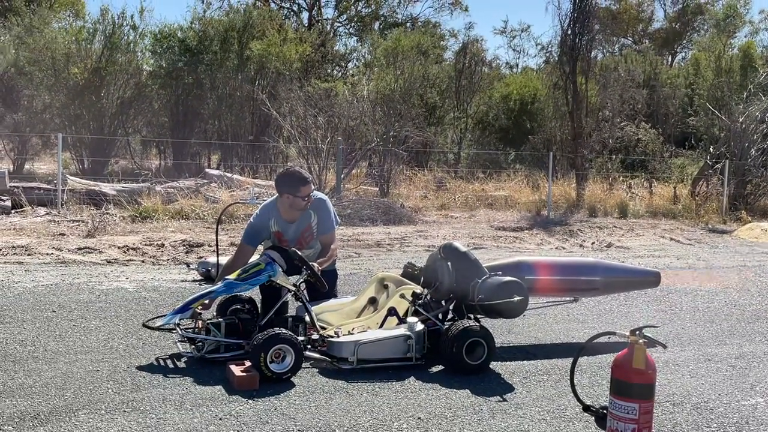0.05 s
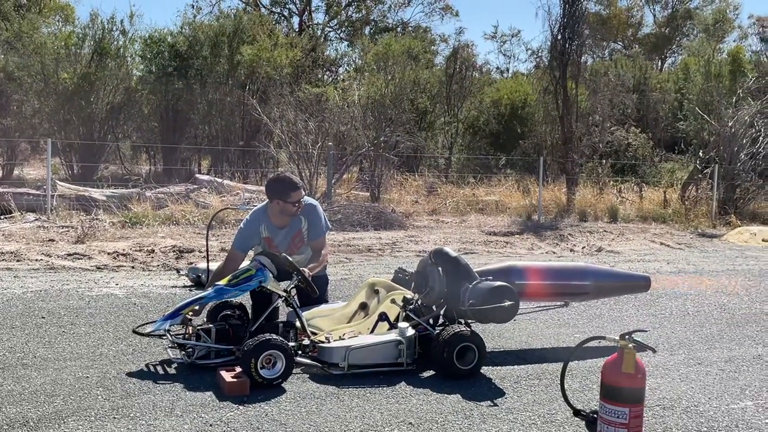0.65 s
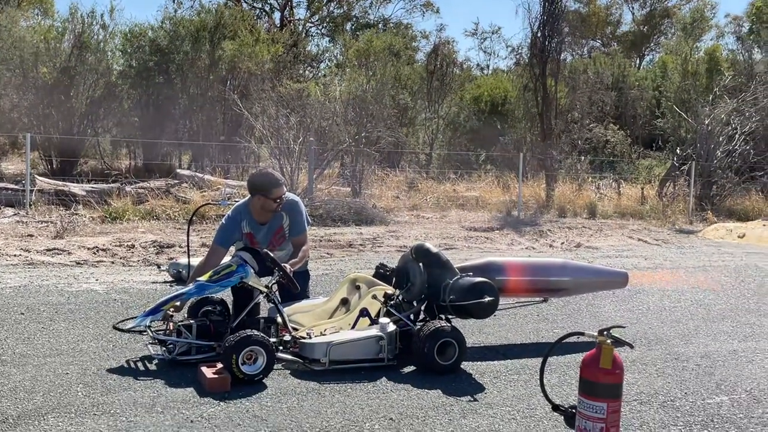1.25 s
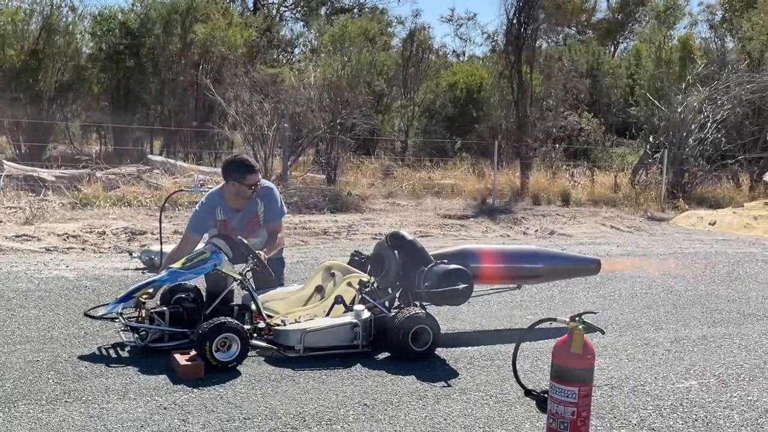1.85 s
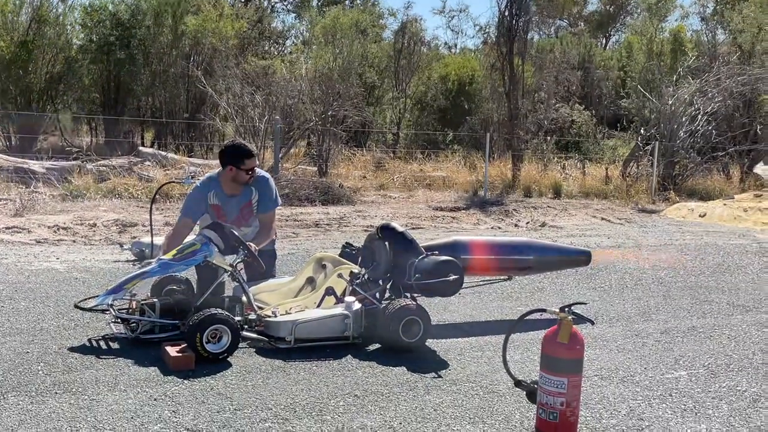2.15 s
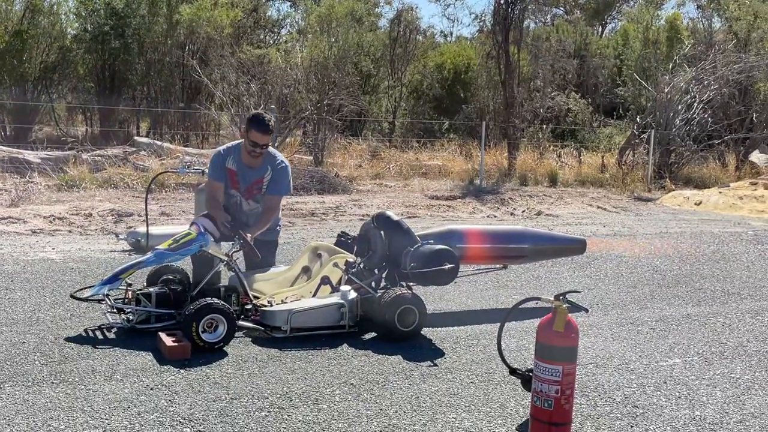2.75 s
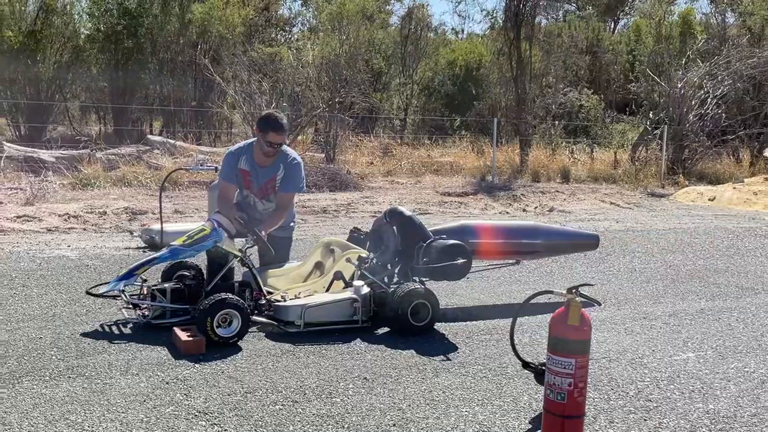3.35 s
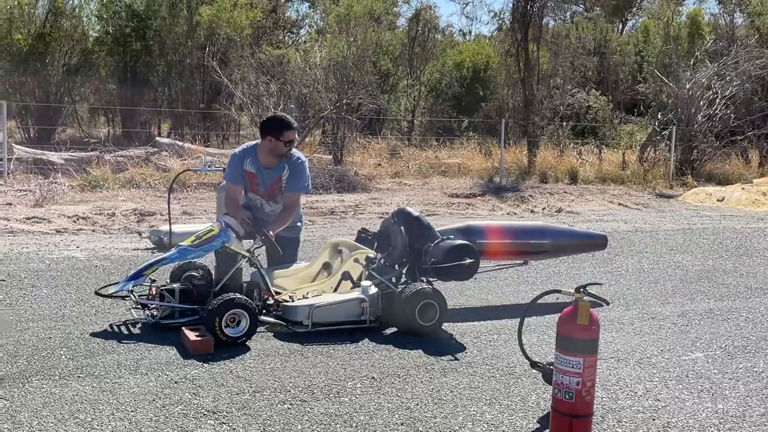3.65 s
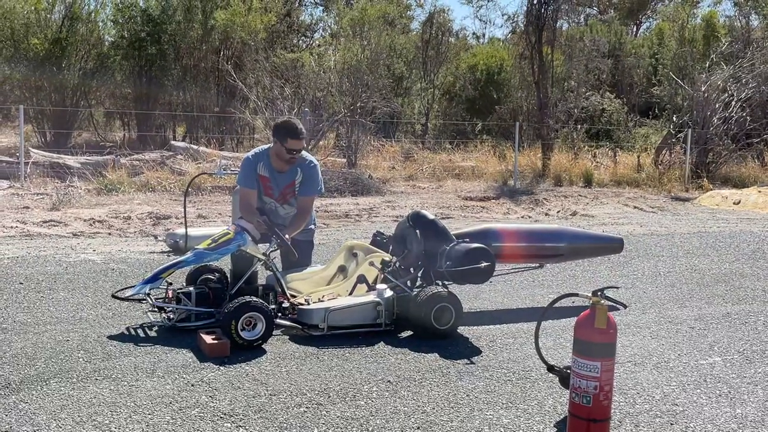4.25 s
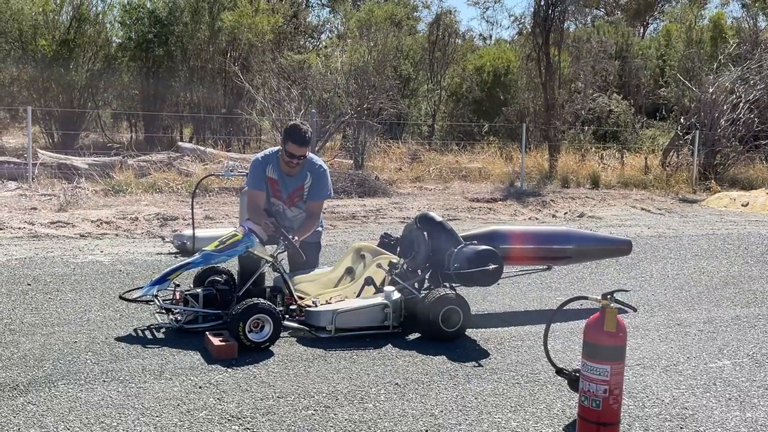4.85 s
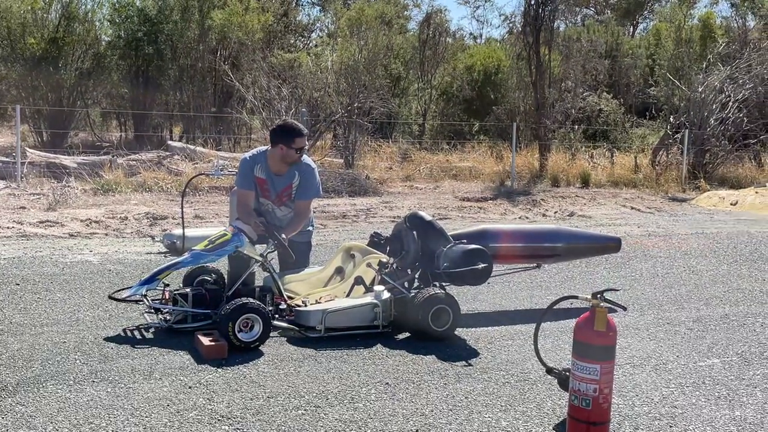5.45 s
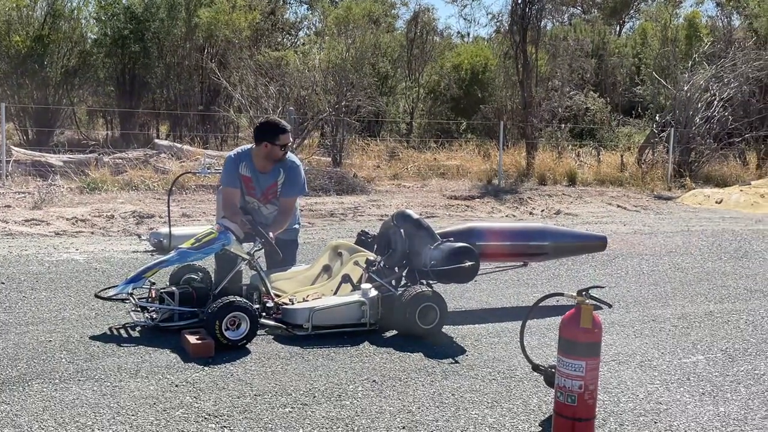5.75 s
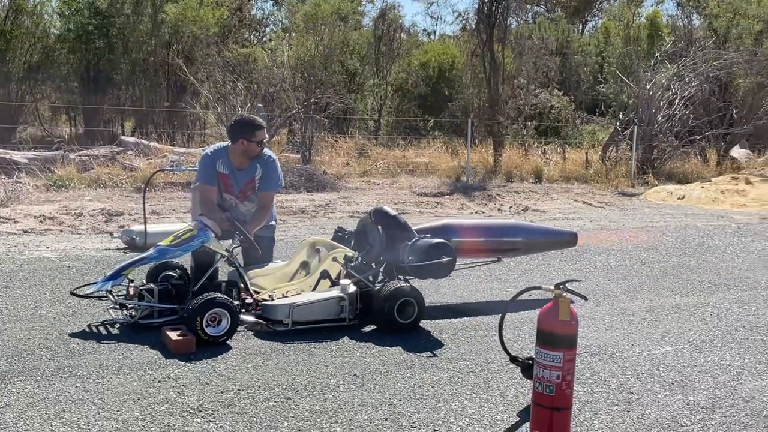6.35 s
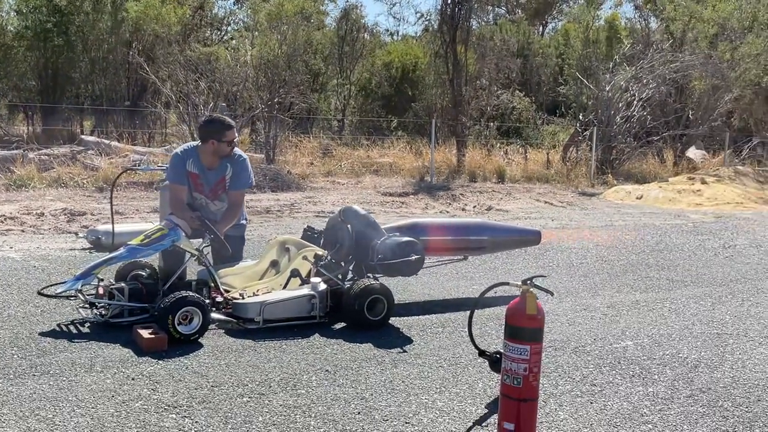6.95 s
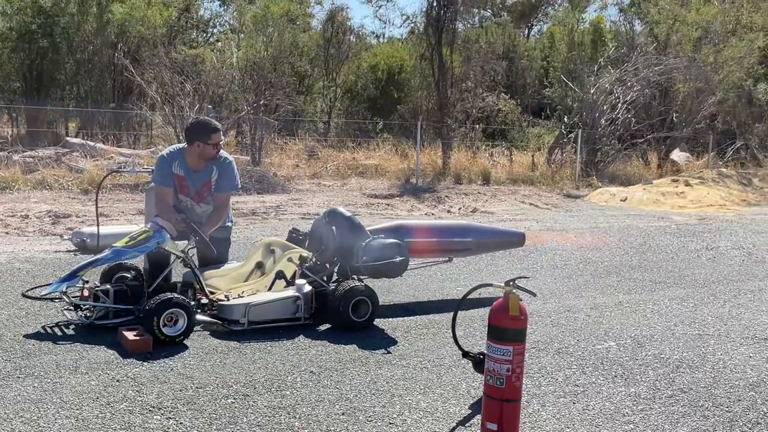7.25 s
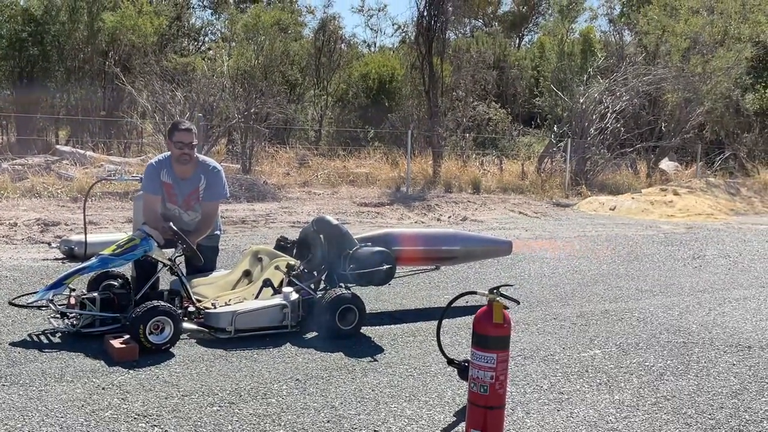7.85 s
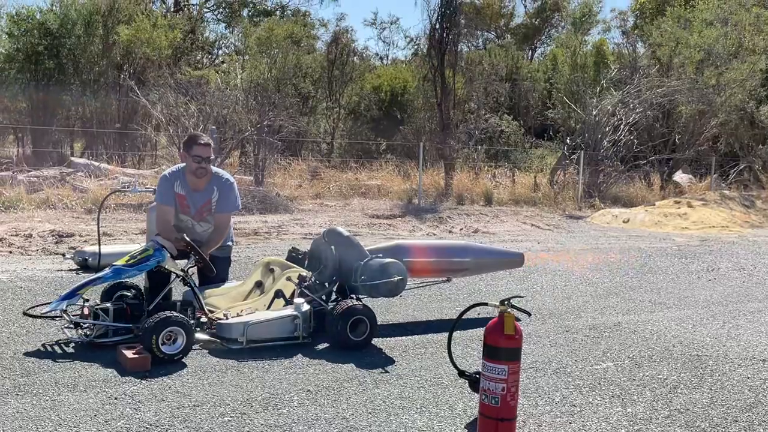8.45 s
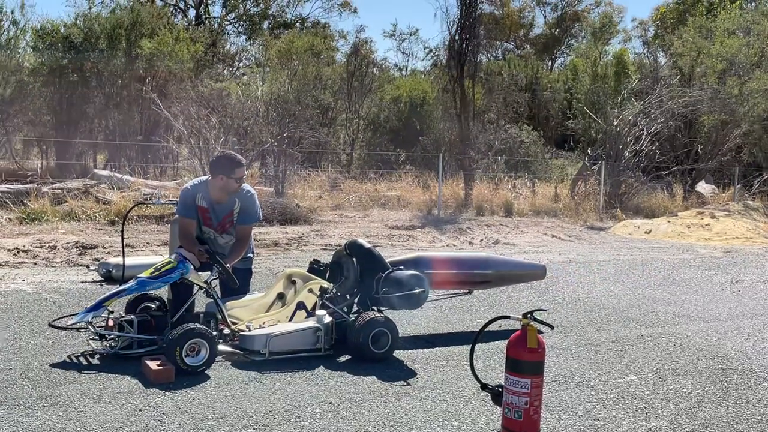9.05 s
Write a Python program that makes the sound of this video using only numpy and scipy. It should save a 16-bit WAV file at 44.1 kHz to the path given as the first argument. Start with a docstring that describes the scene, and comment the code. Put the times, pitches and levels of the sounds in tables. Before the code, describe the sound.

Outdoors on open pavement, a go-kart's small turbojet burns with a deep, tearing, crackling roar, a little right of the microphone. The roar falls away and a thin high whine rises above hissing air. A sudden bang restarts the afterburner, followed by a shriek that fades into more roaring with a few sharp knocks. The flame stops again, leaving whine and hiss.

```python
"""On open asphalt, a parked go-kart runs a home-built turbojet with an afterburner.
The flame roars, rasps and crackles until its fuel is cut. Freed of the back pressure, the rotor
whines upward over the hiss of the intake and the hollow blow of the bare jet pipe.
The afterburner relights with a bang, screeches on a cross mode of the pipe, roars and is cut again."""
import sys
import numpy as np
from scipy import signal
from scipy.fft import rfft, irfft, next_fast_len
from scipy.io import wavfile

SR = 44100
rng = np.random.default_rng(int(sys.argv[2]) if len(sys.argv) > 2 else 0)


def file_out(sig):
    """Save sig as 16-bit WAV at sys.argv[1]."""
    # one column per channel
    cols = np.atleast_2d(sig).T
    # limit, then scale
    lim = np.clip(cols, -1, 1)
    pcm = np.round(lim * 32767).astype(np.int16)
    wavfile.write(sys.argv[1], SR, pcm)


N = 405719
TIME = np.arange(N) / SR
OPPOSITE = np.array([[1], [-1]])  # left and right in opposite polarity
FREE_HZ, CRUISE_HZ = 7225, 6500  # rotor pitch: unloaded, and at cruise
GO_OUT_S = 0.075  # last fade of the flame and of the screech


def from_db(db):
    """Decibels to gain."""
    return 10 ** (np.asarray(db) / 20)


def rms_one(x):
    """Scale to unit rms."""
    return x / np.sqrt(np.mean(x ** 2) + 1e-20)


def butter(order, hz, kind="low"):
    """Butterworth filter sections."""
    return signal.butter(order, hz, kind, fs=SR, output="sos")


def curve(points):
    """Straight lines between (time, value) points, at every sample."""
    return np.interp(TIME, *np.transpose(points))


def ramp(s, length_s):
    """Zero until the given time, then a straight rise to one."""
    return np.clip((TIME - s) / length_s, 0, 1)


def since(s):
    """Seconds gone by since the given time, zero before it."""
    return np.maximum(TIME - s, 0)


def dying(s, time_constant_s):
    """One until the given time, then an exponential fall."""
    return np.exp(-since(s) / time_constant_s)


def bump(s, half_s):
    """A bell-shaped swell that peaks at the given time."""
    return np.exp(-((TIME - s) / half_s) ** 2)


def phase_of(hz):
    """Running phase of a moving pitch."""
    return 2 * np.pi * np.cumsum(hz) / SR


def drift(rate_hz):
    """Random wander of rms 1 at about the given rate, drawn at every tenth sample."""
    r = np.exp(-2 * np.pi * rate_hz * 10 / SR)
    run_in = SR // 10
    white = rng.standard_normal(N // 10 + 2 + run_in)
    slow = signal.lfilter([1], [1, -2 * r, r * r], white)[run_in:]
    return np.interp(np.arange(N) / 10, np.arange(len(slow)), rms_one(slow))


def resonate(x, hz, width_hz):
    """One resonance with gain 1 at its top."""
    r = np.exp(-np.pi * width_hz / SR)
    poles = [1, -2 * r * np.cos(2 * np.pi * hz / SR), r * r]
    return signal.lfilter(np.array([1, 0, -1]) * (1 - r * r) / 2, poles, x)


def gains(colour):
    """Gain of every frequency bin, from (Hz, dB) points joined on a log axis."""
    hz, db = np.transpose(colour)
    bins = np.maximum(np.fft.rfftfreq(next_fast_len(N), 1 / SR), 1)
    return from_db(np.interp(np.log(bins), np.log(hz), db))


def shaped_noise(gain):
    """Gaussian noise with the given gain in every frequency bin."""
    real, imaginary = rng.standard_normal((2, len(gain)))
    return irfft(gain * (real + 1j * imaginary), next_fast_len(N))[:N]


def noise(colour):
    """Coloured noise of rms 1."""
    return rms_one(shaped_noise(gains(colour)))


def narrow_noise(hz, width_hz):
    """A narrow band of noise with rms 1."""
    return rms_one(resonate(resonate(rng.standard_normal(N), hz, width_hz), hz, 4 * width_hz))


def gliding_noise(hz, spread_hz):
    """A band of noise with rms 1 whose centre follows a moving pitch."""
    phase = phase_of(hz)
    return drift(spread_hz) * np.sin(phase) + drift(spread_hz) * np.cos(phase)


# colour of the hiss as heard, centred below 6 kHz, with a gap in the centre near 14 kHz:
# (frequency [Hz], level [dB])
CENTRE_HISS = [(1500, -18), (3000, 7.5), (4500, 12.5), (5800, 7), (6500, 12.5), (7400, -24), (8400, 0),
               (10000, 5.5), (11500, 6), (12900, 1), (13800, -33), (15800, -4)]
SIDE_HISS = [(5000, -90), (6200, -49), (6700, 19.5), (8000, 16), (9500, 10), (11000, -13), (12500, 1),
             (13500, 16.5), (15800, -6)]


def stereo_hiss(side_db):
    """A centred hiss with a wide, bright sheen."""
    return noise(CENTRE_HISS) + from_db(side_db) * noise(SIDE_HISS) * OPPOSITE


def with_ground_echo(x, delay_s=0.0024, sway_s=0.00003, echo_db=-15):
    """A weak reflection off the asphalt lays a slowly shifting ripple over the spectrum."""
    earlier = TIME - delay_s - sway_s * drift(0.8)
    return x + from_db(echo_db) * np.array([np.interp(earlier, TIME, side) for side in x])


# swells of the intake hiss: (time [s], relative level [dB])
SUCTION_SWELLS = [(0, 3.5), (1.0, 0.0574), (2.8, -1.5), (3.24, -4), (3.35, -3), (3.47, -1.5), (3.57, -3),
                  (3.68, 1.5), (3.82, 1.5), (4.0, 5), (4.23, 1.5), (4.55, 4.5), (4.68, 6), (4.77, 9),
                  (4.86, 4), (4.97, 7.5), (5.15, 5), (5.4, 9), (6.15, -0.5), (6.42, 0.5), (6.95, -2),
                  (7.25, 0.5), (7.88, -5), (8.07, 1), (8.3, -5), (8.76, -3.5), (8.93, 0), (9.04, -2),
                  (9.17, 1)]


def intake(hz, cruise_db=-43.5, db_per_hz=-0.0128, flutter_db=1.5):
    """The intake sucks air with a wide, fluttering hiss, softer as the rotor's pitch rises."""
    level_db = cruise_db + db_per_hz * (hz - CRUISE_HZ) + curve(SUCTION_SWELLS)
    return from_db(level_db + flutter_db * drift(16)) * with_ground_echo(stereo_hiss(side_db=-3))


# envelope of the airy whistle: (time [s], level [dB])
WHISTLE_LEVEL = [(3.3, -67.5), (4.0, -58), (4.22, -63), (4.5, -52), (5.4, -58), (8.7, -62), (8.9, -50),
                 (9.2, -53)]


def intake_whistle(hz, ratio=0.652, blade_db=-56, blade_db_per_hz=-0.0053):
    """An airy whistle glides below the whine; blade hiss round the whine thins as the speed rises."""
    whistle = from_db(curve(WHISTLE_LEVEL)) * gliding_noise(ratio * hz, spread_hz=220)
    hiss_db = blade_db + blade_db_per_hz * (hz - CRUISE_HZ)
    return whistle + from_db(hiss_db) * gliding_noise(hz, spread_hz=260)


def brief_whistle(peak_s=6, half_s=0.3, hz=6406, level_db=-45.5, jitter_hz=12):
    """A faint, steady whistle comes and goes just below the whine."""
    tone = np.sqrt(2) * np.sin(phase_of(hz + jitter_hz * drift(40)))
    return from_db(level_db) * bump(peak_s, half_s) * tone


# stereo width of the roar as heard, mono from about 2.3 to 6 kHz: (frequency [Hz], side minus mid [dB])
HEARD_WIDTH = [(40, -68), (130, -35), (300, -23), (600, -15), (1200, -15.5), (1850, -5.5), (2300, -35),
               (6000, -83), (7000, 11), (8300, 9), (10500, -8), (14000, -5)]


def turbulence(colour, lean=0.17):
    """Roaring noise: a core of rms 1 and a side signal that leans it to the right."""
    gain, width, size = gains(colour), gains(HEARD_WIDTH), next_fast_len(N)
    mid = shaped_noise(gain)
    side = shaped_noise(gain * width) - lean * irfft(rfft(mid, size) * width, size)[:N]
    return (mid + side * OPPOSITE) / np.std(mid)


# hollow resonances of the jet pipe: (frequency [Hz], width [Hz], relative level [dB])
PIPE_MODES = [(301, 56, 1), (576, 34, -4), (787, 28, -11), (1406, 60, -11), (2270, 76, -34)]


def pipe_ring():
    """Turbulent gas keeps the resonances of the jet pipe sounding."""
    return rms_one(sum(from_db(db) * rms_one(resonate(rng.standard_normal(N), hz, width_hz))
                       for hz, width_hz, db in PIPE_MODES))


# colour of the bare exhaust: (frequency [Hz], level [dB])
BLOW_COLOUR = [(25, -6), (75, -0.5), (125, 2.5), (200, -1), (480, 1), (750, -6.5), (1000, -13), (1500, -4),
               (1850, -9.5), (2250, -5.5), (3200, -15.5), (4500, -14.5), (6000, -17.5), (8000, -36)]
# envelope of the gas flow through the pipe: (time [s], level [dB])
FLOW_LEVEL = [(3.3, -40), (3.6, -39), (4.05, -35.5), (4.25, -35.5), (4.9, -35), (5.1, -31.5), (5.4, -33.5),
              (5.7, -37), (6.2, -47), (9.2, -35.5)]


def jet_pipe(rush_db=-4, ring_db=-1, side_db=-19, throb_db=1.45):
    """Exhaust blows through the pipe: a broad rush and a hollow, throbbing ring."""
    ring = pipe_ring() + from_db(side_db) * pipe_ring() * OPPOSITE
    rush = from_db(rush_db) * turbulence(BLOW_COLOUR)
    return from_db(curve(FLOW_LEVEL)) * (rush + from_db(ring_db + throb_db * drift(30)) * ring)


# afterburner burns: (lit [s], cut [s], pitch the rotor sags towards [Hz], sag time constant [s])
BURNS = [(-1.17, 3.09, 6240, 1.6), (5.431, 8.568, 6313, 0.58)]


def rotor_hz(spool_s=1.165, spool_delay_s=0.108):
    """Back pressure from each burn drags the rotor down; after the cut it spools up again."""
    hz = np.full(N, float(FREE_HZ))
    for lit_s, cut_s, loaded_hz, sag_s in BURNS:
        for s, goal_hz, glide_s in ((lit_s, loaded_hz, sag_s), (cut_s + spool_delay_s, FREE_HZ, spool_s)):
            glide = goal_hz + (np.interp(s, TIME, hz) - goal_hz) * dying(s, glide_s)
            hz = np.where(TIME < s, hz, glide)
    return hz


# swells and dips of the whine: (time [s], relative level [dB])
WHINE_SWELLS = [(0.0, 3.0), (0.22, -1), (0.46, 2), (0.74, 1), (0.98, 4.5), (1.18, 5), (1.3, -3),
                (1.38, 5.5), (1.66, -5), (1.78, 7), (1.86, -6), (2.02, 1), (2.3, -10), (2.48, 3.0),
                (2.52, -12), (2.64, -3), (2.8, -5), (2.88, 0.5), (3.28, 1.0), (3.34, -6), (3.44, 3),
                (3.66, -12), (3.76, 9), (3.9, 1.5), (4.02, 13), (4.16, -2), (4.56, 5.5), (4.66, 4.5),
                (4.72, 8), (5.12, -1), (5.2, 8), (5.26, -3.0), (5.38, 6), (5.56, -3.5), (5.94, 6),
                (6.08, 6), (6.2, -5.5), (6.26, -1), (6.42, 7.5), (6.62, 4.0), (6.9, 2), (7.0, -4),
                (7.16, 3), (7.44, 2), (7.54, -10), (7.64, 1), (7.72, -12), (7.78, -2), (7.9, -5),
                (8.02, 3.5), (8.46, -6.5), (8.56, 1), (8.64, -5.0), (8.8, 6.5), (9.0, -5.5), (9.18, -1)]
# envelope of its octave: (time [s], level [dB])
OCTAVE_LEVEL = [(0, -55), (0.4, -56), (1.15, -55), (1.9, -65), (3.2, -65), (3.3, -53), (3.8, -57),
                (4.1, -51), (4.5, -53), (5.4, -50), (5.6, -65.5), (6.2, -62), (6.4, -54.5), (6.55, -61),
                (7.0, -63), (7.23, -50), (7.55, -63), (7.85, -61), (8.02, -52), (8.3, -62), (9.2, -52)]
# lag of the whine between the two microphone ports: (frequency [Hz], phase [rad])
PORT_LAG = [(6300, 0.16), (6480, 0.43), (6630, 1.84), (6760, 2.34), (7050, 2.6), (12600, 1.27),
            (13300, 1.6), (14000, 3.1)]


def compressor(hz, whine_db=-45, wander_hz=4.08, shimmer_db=0.2, octave_shimmer_db=2.5):
    """Blades whine at the rotor's pitch and its octave; hot air adds shimmer, speed smears it to hiss."""
    first_db = whine_db + curve(WHINE_SWELLS) + shimmer_db * drift(17)
    octave_db = curve(OCTAVE_LEVEL) + octave_shimmer_db * drift(14)
    phase = phase_of(hz + wander_hz * drift(16))
    smear_db = 0.01 * np.maximum(hz - CRUISE_HZ, 0)
    out = 0
    for k, level_db, skirt_db in ((1, first_db, -9), (2, octave_db, -5)):
        arrival = k * phase + np.interp(k * hz, *np.transpose(PORT_LAG)) * OPPOSITE / 2
        tone = from_db(-smear_db / 2) * np.sin(arrival)
        # eddies chopped by the blades lay a noisy skirt round the tone
        skirt = drift(36) * np.sin(arrival) + drift(66.7) * np.cos(arrival)
        out = out + from_db(level_db) * (tone + from_db(skirt_db + smear_db / 3) * skirt)
    return np.sqrt(2) * out


def with_tails(clicks, time_constant_s):
    """Give every click an exponential tail."""
    return signal.lfilter([1], [1, -np.exp(-1 / (time_constant_s * SR))], clicks + 1e-18)


# loudest peaks in the roar: (time [s], knock drive [dB], snap drive [dB])
ROAR_PEAKS = [(0.247, -19, -26), (2.613, -13, -23), (2.75, -13, -25), (2.861, -8, -28), (2.977, -7, -26),
              (6.485, -5.5, -31.5), (6.962, -6.5, -23.5), (7.111, -6.5, -26), (7.267, -6, -24),
              (7.981, -10, -19), (8.53, -17, -19), (8.573, -7.5, -23)]


def roar_peaks(push_s=0.00069, snap_s=0.002, knock_top_hz=1900, snap_top_hz=2900):
    """The loudest peaks in the roar, each a short knock and a dull snap."""
    pushes, snaps = np.zeros((2, N))
    for s, knock_db, snap_db in ROAR_PEAKS:
        pushes[round(s * SR)] = from_db(knock_db)
        snaps[round(s * SR)] = from_db(snap_db)
    push = with_tails(pushes, push_s)
    knock = 0.5 * push + 3 * resonate(push, hz=560, width_hz=380)
    snap_colour = [(300, -10), (750, -1), (1200, -7), (1600, 0), (2500, 0), (3300, -20)]
    snap = with_tails(snaps, snap_s) * noise(snap_colour)
    return signal.sosfilt(butter(4, snap_top_hz), snap) + signal.sosfilt(butter(3, knock_top_hz), knock)


def pipe_whistle(level_db=-30, hz=4300, peak_s=5.63, swell_s=0.12, jitter_hz=50, flutter_db=5):
    """A higher mode of the pipe whistles in the fresh flame, until the screech takes over."""
    swell = np.exp(np.minimum(TIME - peak_s, 0) / swell_s) * dying(peak_s, 0.025)
    phase = phase_of(hz + jitter_hz * drift(84))
    return from_db(level_db - flutter_db * drift(90)) * swell * np.sin(phase)


# partials of the screech: (harmonic, level [dB], drop after the hold [dB], decay after the hold [dB/s])
SCREECH_PARTIALS = [(1, -27, -2.5, 16.5), (2, -22, 8.5, 13.5), (3, -41.5, 3, 35)]
# it flares up (+) or breaks off (-): (time [s], half length [s], change in the upper partials [dB])
SCREECH_SPURTS = [(5.612, 0.011, -7), (5.642, 0.011, 5.5), (5.67, 0.006, 3), (5.685, 0.005, -8),
                  (5.709, 0.0093, -9.5), (5.723, 0.006, 5), (5.805, 0.009, 4), (5.836, 0.0085, -3),
                  (5.96, 0.011, -1), (6.207, 0.04, -12.5), (6.474, 0.043, -10)]


def screech(start_s=5.603, hold_s=0.212, length_s=0.99, mode_hz=1902, jitter_hz=20, break_hz_per_db=5,
            flutter_db=3, rattle_db=4, rasp_db_per_s=55, port_lag_rad=0.75):
    """The fresh flame locks onto a cross mode of the pipe and shrieks in spurts that calm as it fades."""
    fade_s = start_s + hold_s
    spurt_db = sum(db * bump(s, half_s) for s, half_s, db in SCREECH_SPURTS)
    unrest = dying(fade_s, 0.85)
    # the pitch dives at the onset, then sinks slowly onto the mode
    hz = mode_hz + 123.9 * dying(start_s, 0.0143) + 66.1 * dying(start_s, 0.45)
    # whenever the lock slips or breaks, the tone weakens and jumps upward
    slip = unrest * drift(157)
    phase = phase_of(hz + jitter_hz * slip - break_hz_per_db * unrest * np.minimum(spurt_db, 0))
    tone = 0
    for k, db, drop_db, db_per_s in SCREECH_PARTIALS:
        ragged_db = flutter_db * (drift(43) - 0.9 * slip) + rattle_db * unrest * drift(170)
        ragged_db = np.minimum(ragged_db, 4)  # the oscillation saturates
        # the lowest partial spurts less and reaches the microphone ports out of step
        spurt_share, lag = (0.3, port_lag_rad) if k == 1 else (1, 0)
        level_db = db - drop_db * ramp(fade_s, 0.065) - db_per_s * since(fade_s) + spurt_share * spurt_db
        tone = tone + from_db(level_db + ragged_db) * np.sin(k * phase + lag * OPPOSITE / 2)
    rasp = (from_db(-26) * narrow_noise(hz=1960, width_hz=290)
            + from_db(-28) * narrow_noise(hz=4030, width_hz=270)
            + from_db(-40) * narrow_noise(hz=5970.6, width_hz=170)
            + from_db(-37) * stereo_hiss(side_db=-3))
    locked = ramp(start_s, 0.024) * (1 - ramp(start_s + length_s - GO_OUT_S, GO_OUT_S))
    return locked * (np.sqrt(2) * tone + from_db(-rasp_db_per_s * since(fade_s)) * rasp)


# ignition blast and the puffs after it: (time [s], crack [dB], boom [dB], boom length [s],
# start pitch [Hz], end pitch [Hz], time constant of the pitch drop [s])
BLASTS = [(5.431, -8.5, -6, 0.032, 810, 75, 0.006), (5.449, -22, -4.5, 0.024, 700, 53.33, 0.003),
          (5.465, -20.5, -22, 0.014, 300, 150, 0.00447), (5.502, -20.5, -13, 0.016, 323, 161, 0.0053)]


def relight(body_t60_s=0.14, treble_t60_s=0.057, treble_db=1, split_hz=2800, rise_s=0.0026):
    """Pooled fuel goes off: cracks whose treble dies first, booms that sink as the fireball grows."""
    out = np.zeros((2, N))
    burst = turbulence([(100, 8.5), (600, 6), (1200, -3), (2300, 1), (3300, -6), (5500, -3.5),
                        (8000, -19), (12000, -16), (16000, -48.5)])
    body = signal.sosfiltfilt(butter(2, split_hz), burst)
    treble = burst - body
    age = np.arange(SR // 2) / SR
    attack = np.minimum(age / rise_s, 1)
    for s, crack_db, boom_db, length_s, start_hz, end_hz, sink_s in BLASTS:
        span = slice(round(s * SR), round(s * SR) + len(age))
        crack = from_db(-60 * age / body_t60_s) * body[:, span]
        crack += from_db(treble_db - 60 * age / treble_t60_s) * treble[:, span]
        hz = end_hz + (start_hz - end_hz) * np.exp(-age / sink_s)
        boom = np.sqrt(np.clip(2 * (1 - age / length_s), 0, 1)) * np.sin(phase_of(hz))
        out[:, span] += attack * (from_db(crack_db) * crack + from_db(boom_db) * boom)
    return out


def buffet(level_db=-22, rise_s=0.01146, fall_s=0.052, top_hz=130):
    """The ignition blast shakes the air at the two microphone ports unevenly."""
    s = BLASTS[0][0]
    shake = rms_one(signal.sosfilt(butter(2, top_hz), rng.standard_normal(N)))
    return from_db(level_db) * ramp(s, rise_s) * dying(s + rise_s, fall_s) * shake * OPPOSITE


def crackle(per_s=420, spread_db=2.5, band_hz=(1500, 4500), ring_db=3, top_hz=5800):
    """Small uneven shocks: a jump in pressure, a quick relaxation and a short ring of the nozzle."""
    hits = rng.random(N) < per_s / SR
    shocks = hits * from_db(spread_db * np.minimum(rng.exponential(1, N), 3)) + 1e-18
    cracks = signal.sosfilt(butter(1, band_hz, "band"), shocks)
    ring = from_db(ring_db) * resonate(shocks, hz=2550, width_hz=700)
    return rms_one(signal.sosfilt(butter(6, top_hz), cracks + ring))


# colours of the deep roar and of the tearing rasp, one list per burn: (frequency [Hz], level [dB])
ROAR_COLOURS = [
    [(25, -35), (55, -12), (90, -4), (125, -2), (170, 1), (300, 0.5), (400, -4.5), (540, -8), (660, -9.5),
     (820, -9.5), (1000, -23.5), (1200, -26.5), (2000, -75)],
    [(25, -26), (55, -12.5), (90, -1.5), (130, -0.5), (170, 0.5), (290, 0.5), (400, -5.5), (540, -5),
     (680, -7.5), (850, -9.5), (1080, -18), (1350, -29), (2200, -51)],
]
RASP_COLOURS = [
    [(700, -0.5), (1200, -10), (1570, 0), (1950, -3.5), (2400, -0.5), (2700, -4.5), (3100, -17),
     (4300, -9.5), (5800, -19), (6500, -27.5), (7500, -49), (12000, -43)],
    [(700, -27), (1300, -3.5), (1600, 2), (1850, -1), (2200, 1.5), (2450, -1), (2800, -2), (3330, -16),
     (3650, -10.5), (4400, -9), (5800, -16.5), (6500, -20.5), (7500, -39), (12000, -57)],
]
# brightness of the rasp: (time [s], cut to its lower band [dB])
RASP_BRIGHTNESS = [(0, 1.5), (.65, 2), (1.4, -4), (3.3, -2.5), (5.6, 0), (7.3, -0.5), (8.7, 2)]
# balance of the settled flame, one row per burn: (roar [dB], rasp [dB], roar drop at the cut [dB])
FLAME_LEVELS = [(-18.0, -29.5, 10.5), (-15.5, -29.5, 7)]


def afterburner(crackle_db=-12.5, hiss_db=-19, roar_surge_db=1.67, rasp_surge_db=1.41, split_hz=2200,
                light_s=0.01558, valve_s=0.0098, linger_s=0.22, linger_db_per_s=48.5):
    """The flame burns in fast uneven surges that swell the deep roar, rasp and crackle together."""
    surge = drift(148)
    shocks = from_db(crackle_db) * crackle()
    hiss = from_db(hiss_db) * stereo_hiss(side_db=-2)
    bright_db = curve(RASP_BRIGHTNESS)
    out = 0
    for burn, (lit_s, cut_s, *_) in enumerate(BURNS):
        roar_db, rasp_db, drop_db = FLAME_LEVELS[burn]
        # the valve shuts quickly; fuel left in the line burns on, fades and goes out
        alight = ramp(lit_s, light_s) * (1 - ramp(cut_s + linger_s - GO_OUT_S, GO_OUT_S))
        flame = alight * from_db(-linger_db_per_s * since(cut_s))
        # the flame catches with a short swell, burns thin and raspy, then deepens as it settles
        fireball_db = 12 * dying(lit_s, 0.0215)
        thin_db = 10.5 * dying(lit_s, 0.48)
        raspy_db = 6.5 * (dying(lit_s, 0.84) - dying(lit_s, 0.19))
        low_db = roar_db + fireball_db - thin_db - drop_db * ramp(cut_s, valve_s)
        roar = from_db(low_db + roar_surge_db * surge) * turbulence(ROAR_COLOURS[burn])
        tearing = turbulence(RASP_COLOURS[burn])
        lower = signal.sosfiltfilt(butter(2, split_hz), tearing)
        tilted = from_db(-bright_db) * lower + from_db(0.0824 * bright_db) * (tearing - lower)
        rasp = from_db(rasp_db + raspy_db + rasp_surge_db * surge) * (tilted + shocks + hiss)
        out = out + flame * (roar + rasp)
    return out


def scene():
    """The afterburner over the running engine, the tailpipe slightly to the right."""
    hz = rotor_hz()
    exhaust = afterburner() + roar_peaks() + pipe_whistle() + screech() + relight() + buffet()
    return exhaust + jet_pipe() + intake(hz) + compressor(hz) + intake_whistle(hz) + brief_whistle()


def record(dry, low_cut_hz=45, high_cut_hz=15750):
    """The deepest bass is lost, the highest peaks are rounded off and the top is cut."""
    thinned = signal.sosfilt(butter(4, low_cut_hz, "high"), dry)
    rounded = thinned / (1 + thinned ** 4) ** (1 / 4)
    return signal.sosfilt(signal.ellip(10, .1, 80, high_cut_hz, fs=SR, output="sos"), rounded)


dry = scene()
out = record(dry)
file_out(out)
```